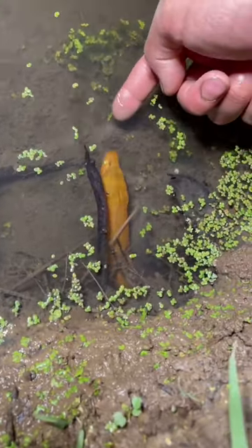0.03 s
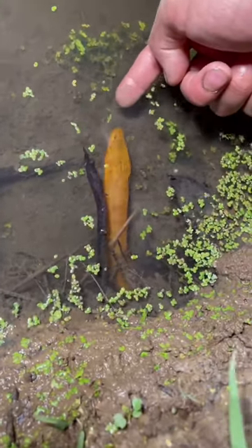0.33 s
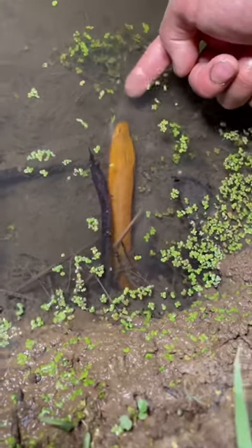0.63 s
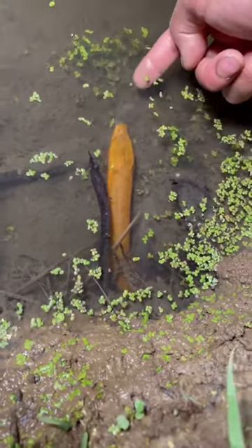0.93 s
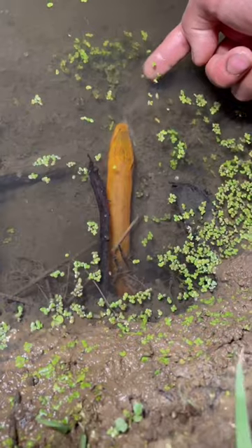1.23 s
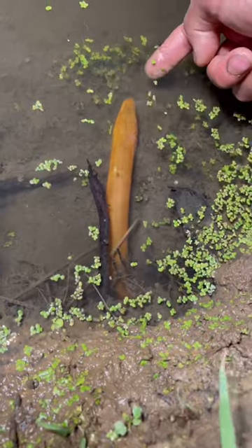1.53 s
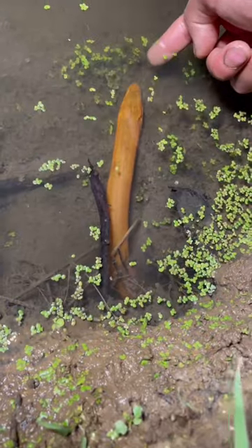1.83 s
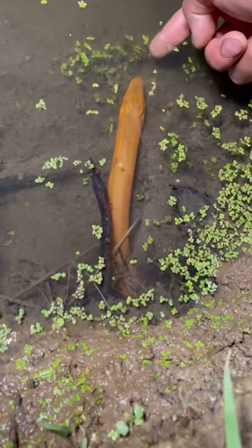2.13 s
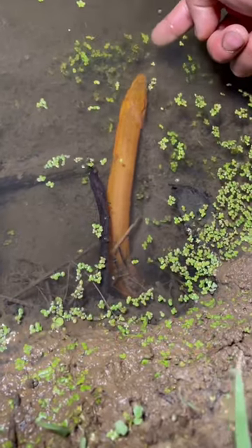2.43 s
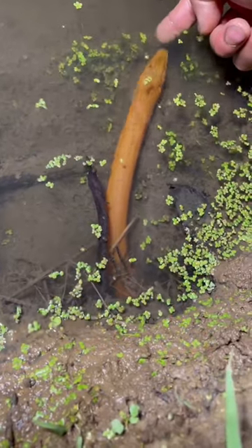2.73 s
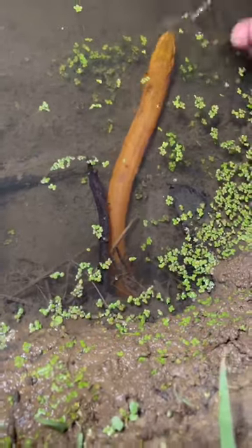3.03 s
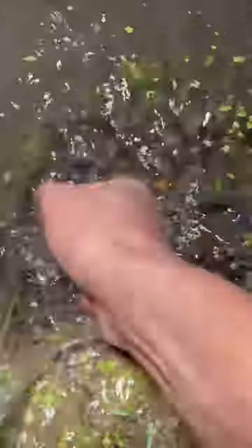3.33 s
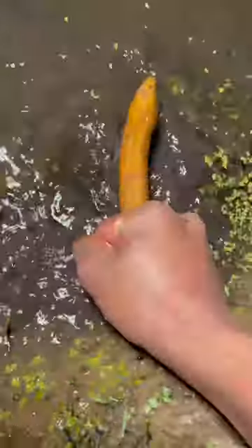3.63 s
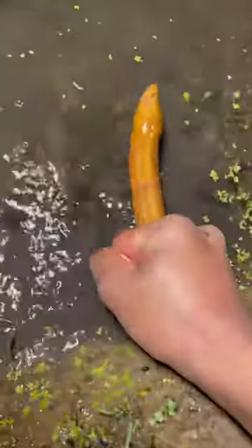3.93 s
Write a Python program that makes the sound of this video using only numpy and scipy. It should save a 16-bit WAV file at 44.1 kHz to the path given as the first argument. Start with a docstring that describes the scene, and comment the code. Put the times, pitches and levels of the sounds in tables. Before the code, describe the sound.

Faint outdoor hiss, then one loud, close splash of a hand grabbing into shallow water.

```python
"""Quiet open-air hiss and far-off birds come first, at a muddy bank, on a handheld camera's stereo mic.
Air buffets the mic in soft rumbles, the odd drop ticks, and the hand holding the camera bumps it.
About three seconds in, close up, a hand snatches into the shallows: fingers and palm slap the surface,
trapped air rings as bubbles, spray falls back and a few drips follow."""
import sys
import numpy as np
from scipy import signal
from scipy.fft import rfft, irfft
from scipy.io import wavfile
from scipy.ndimage import uniform_filter1d

SR = 44100
rng = np.random.default_rng(int(sys.argv[2]) if len(sys.argv) > 2 else 0)


def store_pcm(level_fs):
    """Save levels as 16-bit WAV."""
    pcm = np.round(np.clip(level_fs, -1, 1) * 32767).astype(np.int16)
    wavfile.write(sys.argv[1], SR, np.atleast_2d(pcm).T)


N = 176400
TIME, FREQS = np.arange(N) / SR, np.fft.rfftfreq(N, 1 / SR)


def amp(db):
    """Decibels to gain."""
    return 10 ** (np.asarray(db) / 20)


def unit(x):
    """Scales to rms 1."""
    return x / np.sqrt(np.mean(x ** 2) + 1e-20)


def noise():
    """Two unrelated white noises."""
    return rng.standard_normal((2, N))


def curve(points):
    """Spreads (frequency, value) points over the spectrum."""
    hz, value = np.transpose(points)
    return np.interp(np.log(FREQS + 1), np.log(hz + 1), value)


def add(mix, s, sound):
    """Mixes a sound in at time s."""
    part = mix[max(round(s * SR), 0):][:len(sound)]
    part += sound[:len(part)]


def steady(x, span_s):
    """Holds a texture's running level near 1, keeping its fine grain."""
    power = uniform_filter1d((x ** 2).mean(0), max(int(span_s * SR), 2))
    return x / np.sqrt(abs(power) + power.mean() / 100)


# phase between the mic's two ports: (frequency [Hz], left lead [rad])
PORT_PHASE = [(150, 0), (400, -.3), (750, -.6), (1200, .1), (2800, .3), (3600, .8), (5200, 0), (6500, .9),
              (8500, 2.65), (9700, 3.1), (11000, 3.2), (11600, 3.5), (13000, 5.1), (14300, 6.2)]
def mic_ports(left, right, balance_db=0):
    """Two spectra become two channels, with the ports' phase and level difference."""
    tilt = amp(balance_db / 2) * np.exp(.5j * curve(PORT_PHASE))
    return irfft(np.array([left * tilt, right / tilt]), N)


def texture(pair, colour, likeness, balance_db=0):
    """Colours two unrelated signals and blends them into a stereo sound of rms 1."""
    a, b = rfft(pair) * amp(curve(colour))
    same = np.clip(curve(likeness), -1, 1)
    common, apart = a * np.sqrt(1 + same), b * np.sqrt(1 - same)
    return unit(mic_ports(common + apart, common - apart, balance_db))


# spectrum of the open air: (frequency [Hz], level [dB])
HISS_COLOUR = [(30, 22), (150, 12.5), (300, 8), (520, 10.5), (680, -2), (1100, -1), (1600, -0.5), (2000, 4),
               (2350, -1.5), (4000, 0.5), (4600, 1), (5200, -3), (7500, -4), (10000, -10.5), (13000, -9),
               (15200, -37)]
# its slow swell: (time [s], level [dB])
HISS_LEVEL = [(0, -59), (1.7, -59.5), (2.8, -59), (3.3, -55.5), (4, -59.5)]
# how alike the air is at the two ports: (frequency [Hz], likeness [0-1])
AIR_LIKENESS = [(60, 0.8), (250, 0.55), (600, 0.028), (1800, 0.15), (2500, 0.2), (4500, 0.32), (6000, .77),
                (8000, 1), (9500, 1), (11000, 1), (12600, 0.8), (14300, 0.84)]
def hiss(patchy_db=1.75):
    """Quiet outdoor air all around the mic, drifting a little in patches."""
    air = texture(noise(), HISS_COLOUR, AIR_LIKENESS)
    spectra = signal.stft(air, nperseg=1024)[2]
    patches = uniform_filter1d(rng.standard_normal(spectra.shape[1:]), size=8, axis=0)
    patches = unit(uniform_filter1d(patches, size=9, axis=1))
    drifting = signal.istft(spectra * amp(patchy_db * patches), nperseg=1024)[1][:, :N]
    return amp(np.interp(TIME, *np.transpose(HISS_LEVEL))) * drifting


# far-off calls: (time [s], half length [s], pitch [Hz], half bandwidth [Hz], level [dB])
BIRD_CALLS = [(.005, 0.013, 1930, 70, -65), (0.142, 0.0055, 2040, 70, -63.5),
              (0.337, 0.0033, 2050, 90, -57), (0.651, 0.005, 2080, 70, -60.5),
              (0.976, .004, 2090, 90, -53.5), (1.008, 0.0089, 2020, 60, -64), (0.748, 0.19, 1284, 89, -74),
              (1.35, .08, 1287, 112, -70), (1.937, 0.096, 1315, 108, -71), (2.416, 0.072, 1310, 110, -70)]
def birds():
    """Short peeps and longer calls, blurred by distance into narrow bands of noise."""
    out = np.zeros((2, N))
    for s, half, hz, width, db in BIRD_CALLS:
        mid, side = rfft(noise()) / (1 + ((FREQS - hz) / width) ** 4)
        band = irfft(np.array([mid + .5 * side, mid - .5 * side]), N)
        out += amp(db) * np.exp(-((TIME - s) / half) ** 2 / 2) * steady(band, 0.017)
    return out


# drops and wet ticks near the mic: (time [s], pitch [Hz], level [dB])
DRIPS = [(0.094, 1000, -47), (1.943, 1120, -50.5), (2.386, 790, -51.5), (2.903, 9000, -42),
         (3.051, 1090, -48), (3.192, 6600, -21), (3.2308, 6350, -19.5), (3.2557, 5750, -22.5),
         (3.284, 7140, -24), (3.349, 6070, -23), (3.3695, 6760, -21), (3.4473, 3020, -33),
         (3.4764, 2900, -32), (3.495, 4200, -34), (3.5531, 1350, -44), (3.604, 3060, -35),
         (3.7693, 2110, -42), (3.8065, 4130, -40), (3.8127, 10000, -29.5)]
def drips(rise_cycles=.8):
    """Each drop lands with a tick of one or two soft-edged cycles."""
    out = np.zeros(N)
    for s, hz, db in DRIPS:
        turns = TIME[:1024] * hz
        tick = np.sin(2 * np.pi * turns) * turns ** 2 * np.exp(-2 * turns / rise_cycles)
        add(out, s, amp(db) * tick / abs(tick).max())
    return out


# gusts right on the mic: (time [s], half width [s], level [dB])
GUSTS = [(0.123, 0.026, -39), (.168, 0.043, -44.5), (0.348, 0.05, -48.5), (0.447, 0.0085, -48),
         (.558, 0.037, -55), (1.16, 0.069, -48), (1.32, 0.055, -54.5), (1.527, 0.018, -48.5),
         (2.361, 0.046, -53.5), (2.47, 0.05, -51), (2.71, 0.014, -57.5), (2.87, 0.061, -54),
         (3.2, 0.018, -57), (3.39, 0.034, -53), (3.59, 0.055, -55.5), (3.688, 0.02, -52.5),
         (3.763, 0.028, -59.5), (3.88, .034, -59.5)]
# their rumble: (frequency [Hz], level [dB])
RUMBLE_COLOUR = [(18, -17), (35, -4.5), (58, 9.5), (85, 2), (130, -4), (200, -13), (300, -25.5), (500, -59),
                 (1200, -87)]
# their flutter: (frequency [Hz], level [dB])
FLUTTER_COLOUR = [(60, -43), (125, 1.5), (190, -9), (300, -30), (500, -44), (1200, -67)]
# how alike low sounds are at the two ports: (frequency [Hz], likeness [0-1])
LOW_LIKENESS = [(30, .975), (300, .88)]
def buffets(breeze_db=-86, flutter_db=-37, flutter_growth=1.84):
    """Low lumps of moving air hit the mic; the stronger ones flutter higher up."""
    gust_power = sum(amp(db) ** 2 * np.exp(-((TIME - s) / width) ** 2) for s, width, db in GUSTS)
    level = np.sqrt(amp(breeze_db) ** 2 + gust_power)
    rumble = steady(texture(noise(), RUMBLE_COLOUR, LOW_LIKENESS), 0.11)
    flutter = steady(texture(noise(), FLUTTER_COLOUR, LOW_LIKENESS), 0.11)
    return level * rumble + amp(flutter_db) * (level / level.max()) ** flutter_growth * flutter


# handling noise on the camera body: (time [s], pitch [Hz], level [dB])
BUMPS = [(1.167, 85, -41), (1.218, 76.5, -35.5), (1.817, 104, -40), (3.48, 90, -47), (3.528, 86.5, -39.5)]
def bumps(half_cycles=0.56):
    """Soft knocks from the hand holding the camera, each a low swing or two."""
    return sum(amp(db) * np.sin(2 * np.pi * hz * (s - TIME))
               * np.exp(-((TIME - s) * hz / half_cycles) ** 2) for s, hz, db in BUMPS)


def bubble(hz, decay_s, onset_cycles=0.22):
    """A pocket of air rings, rising in pitch as it nears the surface; peak 1."""
    glide = 0.019  # fractional pitch rise per decay time
    t = np.arange(int(7 * decay_s * SR) + 8) / SR
    tone = np.sin(2 * np.pi * hz * t * (1 + glide * t / decay_s / 2))
    ring = tone * np.exp(-t / decay_s) * (1 - np.exp(-t * hz / onset_cycles))
    return ring / abs(ring).max()


def swarm(per_s, spread_db, low_hz, high_hz, cycles, pitches=28):
    """Two random streams of small bubbles, starting with the splash's first surge."""
    born = (rng.random((2, N)) < per_s / SR) & (TIME > SURGES[0][0])
    strength = np.minimum(rng.exponential(1, (2, N)), 3.5)
    kind = rng.integers(0, pitches, (2, N))
    rings = [bubble(hz, cycles / hz) for hz in np.geomspace(low_hz, high_hz, pitches)]
    out = np.zeros((2, N))
    for side, at in zip(*np.nonzero(born)):
        ring = rings[kind[side, at]]
        add(out[side], at / SR, ring * amp(spread_db * strength[side, at]) / len(ring))
    return out


# swell of the high fizz: (time [s], level [dB])
FIZZ_LEVEL = [(1.7, -77), (2.2, -68), (2.9, -65.5), (3.2, -60), (3.55, -63.5), (3.75, -65.5), (4, -65.5)]
# its spectrum: (frequency [Hz], level [dB])
FIZZ_COLOUR = [(2000, -17), (5000, -3.5), (8000, 5), (13000, 2.5), (15500, -12.5)]
def fizz():
    """A fine high hiss creeps up as the hand nears; from the splash on, tiny bubbles prickle in it."""
    prickle = 0.17 * steady(swarm(per_s=800, spread_db=2, low_hz=4000, high_hz=15000, cycles=3), .1)
    level = amp(np.interp(TIME, *np.transpose(FIZZ_LEVEL)))
    return level * texture(prickle + noise(), FIZZ_COLOUR, AIR_LIKENESS)


# where the water sits in the stereo image: (frequency [Hz], left minus right [dB])
WATER_BALANCE = [(100, 0), (400, 0), (650, -4), (1100, -6), (2000, -2), (3300, -1.2), (6000, .3), (9000, 0)]
# how alike it is at the two ports: (frequency [Hz], likeness [0-1])
WATER_LIKENESS = [(300, 0.42), (2000, 0.94), (3300, 0.26), (4700, 0.19), (5600, 0.63), (8000, 0.58),
                  (9700, 0.98), (11200, 1), (12600, 0.31), (14300, .97)]
def close_water(pair, colour, span_s):
    """An even texture placed at the splash, close to the mic and a little to the right."""
    return steady(texture(pair, colour, WATER_LIKENESS, curve(WATER_BALANCE)), span_s)


# water thrown up and falling back: (time [s], rise [s], decay [s], droplets [dB], churn [dB])
SURGES = [(3.01, 0.1, .3, -62, -53), (3.132, 0.023, 0.057, -28.5, -38.5), (3.162, .004, 0.018, -20, -36),
          (3.221, 0.006, 0.03, -35, -35.5), (3.273, 0.00095, 0.01, -31.5, -36),
          (3.278, .008, 0.051, -39.5, -34.5), (3.36, 0.01, 0.008, -35.5, -40.5),
          (3.385, 0.0031, 0.17, -49, -73), (3.441, 0.0081, 0.0064, -37, -45.5),
          (3.465, 0.0026, .017, -41, -48)]
# spectrum of the droplets: (frequency [Hz], level [dB])
DROPLET_COLOUR = [(300, -37), (1500, -2), (3000, 1.5), (4400, -4), (5600, 2), (8500, -2.5), (10500, 7),
                  (13500, 2), (15500, -14)]
# spectrum of the churn: (frequency [Hz], level [dB])
CHURN_COLOUR = [(100, -31), (250, -2), (430, -7), (700, -2), (1100, -2), (1900, 2.5), (2700, -6),
                (4000, -5.5), (9000, -54)]
def spray():
    """Each surge throws fine droplets and churns larger bubbles under them."""
    s, rise, decay, droplets_db, churn_db = np.transpose(SURGES)[:, :, None]
    shape = np.clip((TIME - s) / rise, 0, 1) * np.exp(-np.maximum(TIME - s - rise, 0) / decay)
    mist = .5 * noise()
    droplets = swarm(per_s=2600, spread_db=3.5, low_hz=2004, high_hz=9120, cycles=7.2)
    churn = swarm(per_s=650, spread_db=3, low_hz=500, high_hz=3680, cycles=3.9)
    droplets = close_water(steady(droplets, 0.061) + mist, DROPLET_COLOUR, 0.0092)
    churn = close_water(steady(churn, 0.032) + mist[::-1], CHURN_COLOUR, 0.0092)
    droplet_level = np.linalg.norm(shape * amp(droplets_db), axis=0)  # surges add in power
    churn_level = np.linalg.norm(shape * amp(churn_db), axis=0)
    return droplet_level * droplets + churn_level * churn


# spectrum of water shoved aside: (frequency [Hz], level [dB])
SLOSH_COLOUR = [(40, -16), (120, -0.5), (220, -3), (400, -9), (900, -38)]
def slosh(peak_s=3.25, width_s=0.079, db=-51.5):
    """The dull push of water displaced by the fist."""
    level = amp(db) * np.exp(-((TIME - peak_s) / width_s) ** 2 / 2)
    return level * steady(texture(noise(), SLOSH_COLOUR, LOW_LIKENESS), 0.035)


# single bubbles, close up: (time [s], pitch [Hz], level [dB], decay [s])
BUBBLES = [(3.1343, 997, -22.5, 0.0078), (3.1394, 2740, -19, 0.0018), (3.145, 7960, -12.5, 0.0011),
           (3.1438, 3500, -20, 0.0013), (3.1473, 1710, -25.5, 0.0034), (3.168, 768, -27, 0.0091),
           (3.1687, 1930, -20, 0.0015), (3.1725, 1877, -18.5, 0.0044), (3.185, 1653, -28.5, 0.014),
           (3.1893, 1220, -26.5, 0.0025), (3.2096, 2450, -24.5, .0024), (3.2371, 1790, -24, 0.0022),
           (3.2566, 1590, -30.5, 0.0049), (3.274, 3210, -31, .003), (3.3038, 1810, -21.5, 0.0029),
           (3.315, 1926, -26.5, 0.0034), (3.3414, 1830, -24.5, 0.0027), (3.3488, 1070, -27.5, .0016),
           (3.3635, 5970, -26, .0025), (3.369, 6430, -27.5, 0.0011), (3.393, 2020, -43, .006),
           (3.432, 1880, -43, .004), (3.448, 1790, -34.5, 0.0018), (3.455, 2680, -38.5, 0.0032),
           (3.4643, 4100, -26, 0.00084), (3.474, 1840, -38, 0.0023), (3.4873, 1440, -40.5, 0.0052),
           (3.495, 2130, -42.5, 0.0052), (3.527, 6420, -40, 0.002)]
def bubbles():
    """Air trapped by the hand rings, one pocket at a time."""
    out = np.zeros(N)
    for s, hz, db, decay in BUBBLES:
        add(out, s, amp(db) * bubble(hz, decay))
    return out


# fingers, then palm and fist, hit the water close to the mic: (time [s], length [s], level [dB])
SLAPS = [(3.1391, 0.0028, -29.5), (3.1437, 0.0012, -20), (3.1671, 0.0032, -23), (3.172, 0.0034, -13.5),
         (3.1765, 0.0021, -18.5), (3.1896, 0.0018, -27), (3.2765, .004, -30)]
# spectrum of a slap: (frequency [Hz], level [dB])
SLAP_COLOUR = [(100, -33), (450, -43), (780, -2), (1400, -9), (1900, -1), (3000, -3), (4200, -9),
               (5500, 0.5), (7000, -1), (9000, -4), (13500, -7), (15500, -20)]
def slaps(rise_s=0.00067, release_s=0.0011):
    """Short bright bursts as the hand breaks the surface."""
    level = np.zeros(N)
    for s, length, db in SLAPS:
        attack = np.clip((TIME - s) / rise_s, 0, 1)
        level += amp(db) * attack * np.exp(-np.maximum(TIME - s - length, 0) / release_s)
    return level * close_water(noise(), SLAP_COLOUR, 0.013)


# air cavities behind the hand: (time [s], length [s], start pitch [Hz], end pitch [Hz], level [dB])
GLUGS = [(3.22, 0.033, 1102, 1335, -36), (3.248, 0.0184, 200, 171, -39.5), (3.283, 0.037, 345, 372, -42),
         (3.2902, 0.016, 590, 414, -24), (3.328, 0.019, 950, 1320, -35.5), (3.329, 0.024, 706, 880, -36.5)]
def glugs():
    """Each closing cavity swells into a tone that slides as its shape changes."""
    out = np.zeros(N)
    for s, length, start_hz, end_hz, db in GLUGS:
        progress = np.linspace(0, 1, int(length * SR))
        hz = start_hz * (end_hz / start_hz) ** progress
        swell = np.sin(np.pi * progress ** 0.43) ** 2  # rises faster than it fades
        add(out, s, amp(db) * swell * np.sin(2 * np.pi * np.cumsum(hz) / SR))
    return out


def bank_echoes(water, db=-17, decay_s=0.011, top_hz=7500, size=4096):
    """A brief scatter of weak echoes off the nearby mud and arm, which soak up the treble."""
    taps = rng.standard_normal((2, size)) * (rng.random((2, size)) < .05)
    taps *= np.exp(-TIME[:size] / decay_s)
    taps /= np.linalg.norm(taps, axis=1, keepdims=True)
    echoes = signal.oaconvolve(water, taps, axes=1)[:, :N]
    return amp(db) * irfft(rfft(echoes) / (1 + (FREQS / top_hz) ** 8), N)


def scene():
    """From the bank: the splash close by, wind and handling on the mic, air and birds beyond."""
    plops = rfft(drips() + bubbles() + glugs())
    water = slaps() + spray() + mic_ports(plops, plops, curve(WATER_BALANCE)) + slosh()
    return water + bank_echoes(water) + fizz() + buffets() + bumps() + hiss() + birds()


def record(dry):
    """The camera's low cut and band limit."""
    low_cut_hz, top_hz = 43, 15700
    low_cut = signal.butter(4, low_cut_hz, btype="high", fs=SR, output="sos")
    band_limit = signal.firwin(511, top_hz, window=("kaiser", 9), fs=SR)
    return signal.oaconvolve(signal.sosfilt(low_cut, dry), band_limit[None], "same")


dry = scene()
out = record(dry)
store_pcm(out)
```